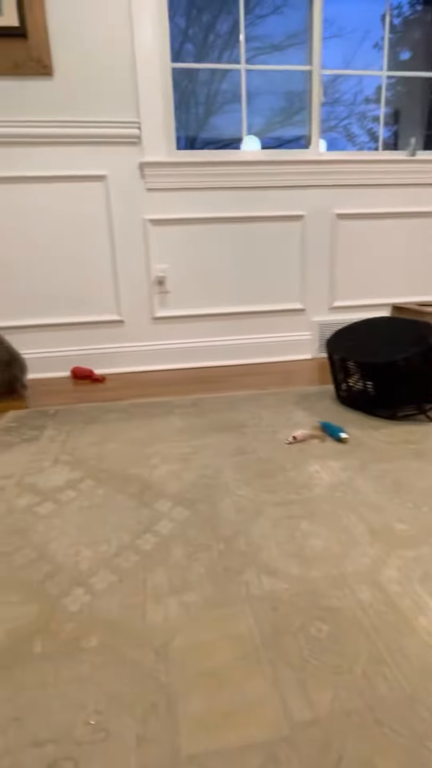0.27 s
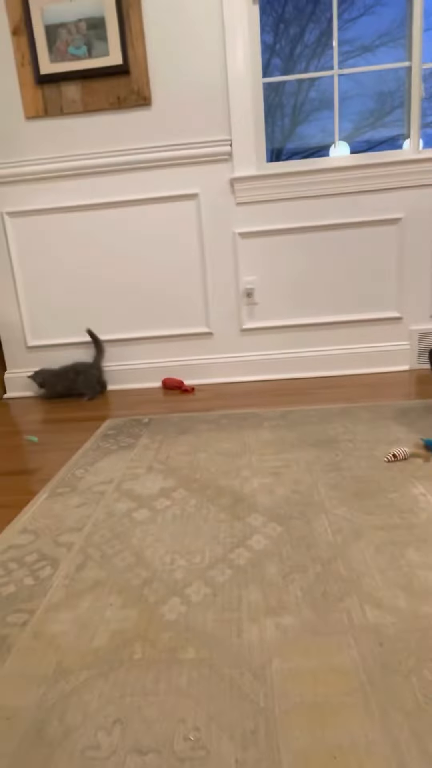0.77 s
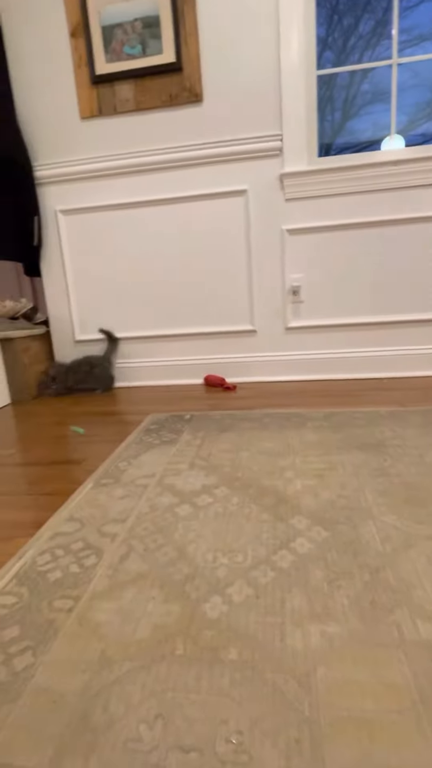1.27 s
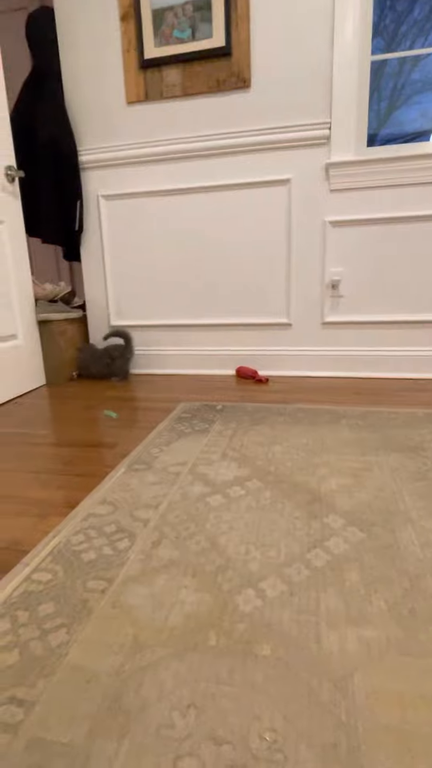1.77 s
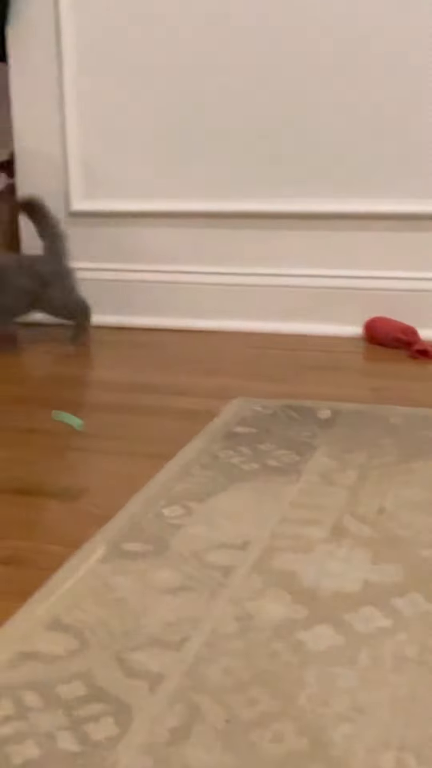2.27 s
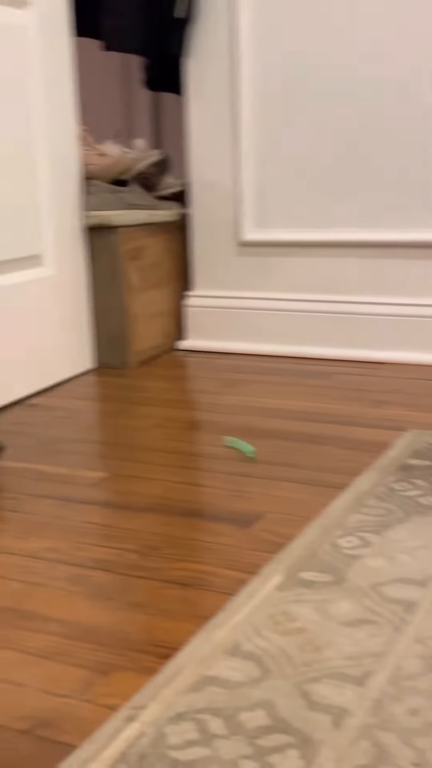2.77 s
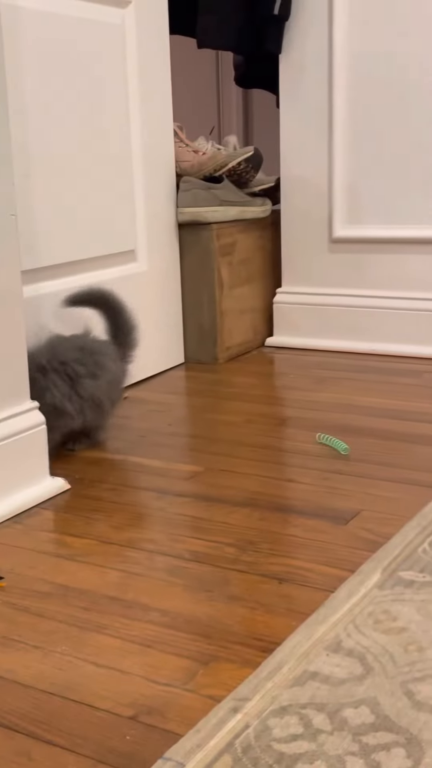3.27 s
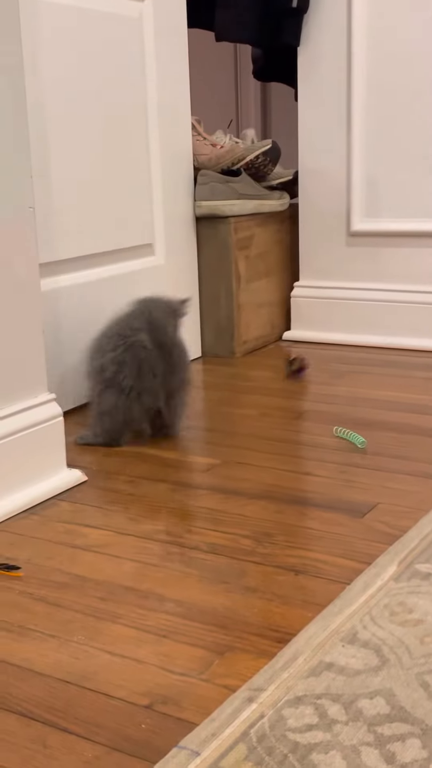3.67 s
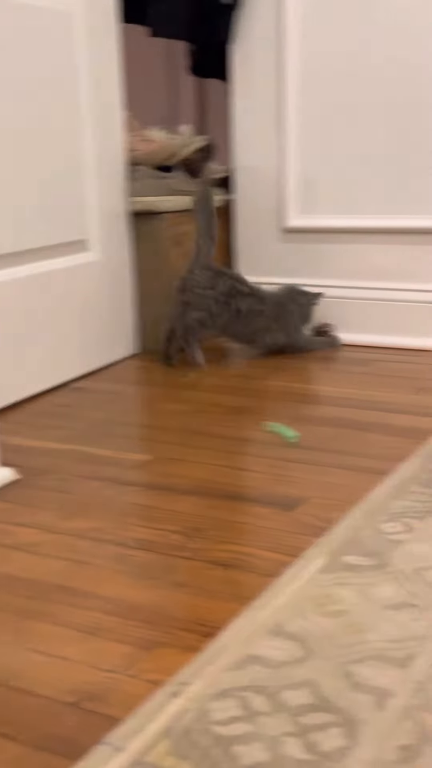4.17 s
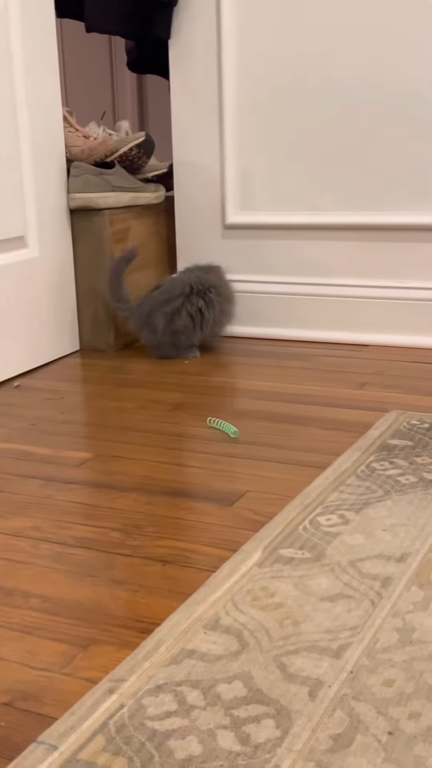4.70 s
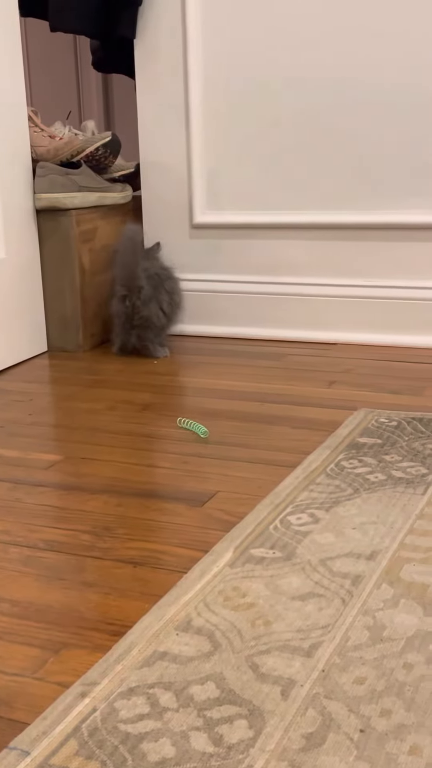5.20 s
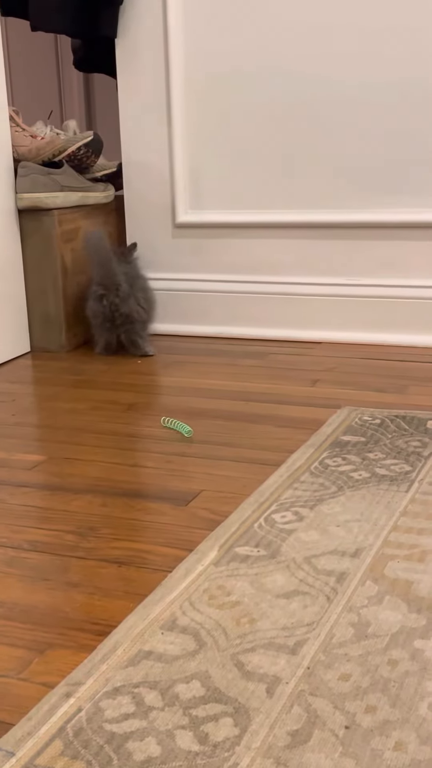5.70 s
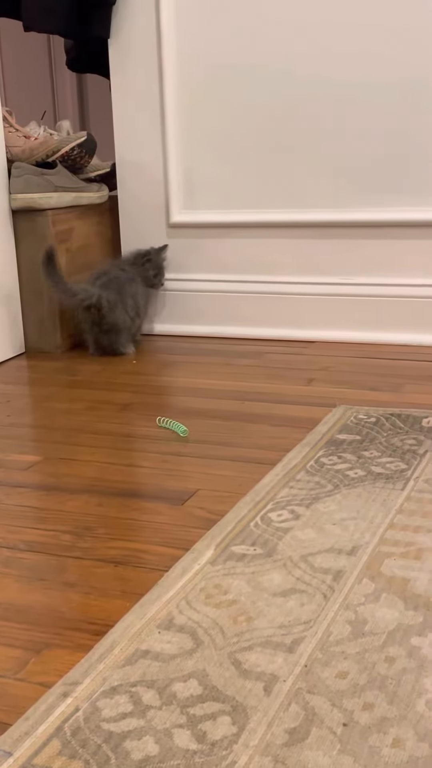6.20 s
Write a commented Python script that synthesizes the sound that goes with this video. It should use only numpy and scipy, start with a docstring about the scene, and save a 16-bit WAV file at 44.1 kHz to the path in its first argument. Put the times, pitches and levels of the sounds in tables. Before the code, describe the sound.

A kitten scampers indoors, paws thudding softly and claws ticking on wood while a crinkly foil ball rustles and rattles in irregular bursts.

```python
"""In a quiet hall, a kitten scampers over a rug and a wooden floor, chasing a crinkly foil ball.
Paws thud as dying low tones, knocks wake the wood, claws and ball tick, and random clicks make the foil rustle.
A faint squeak sounds once; fingers creak on the phone casing: short dying tones, each slightly off in pitch.
Filtered noise gives the low hum of the house. Two microphone ports a few centimetres apart hear it all."""
import sys
import numpy as np
from scipy import signal
from scipy.fft import rfft, irfft
from scipy.io import wavfile
from scipy.ndimage import uniform_filter1d

SR = 44100
rng = np.random.default_rng(int(sys.argv[2]) if len(sys.argv) > 2 else 0)


def int16_out(signal):
    """Quantize to a 16-bit WAV file."""
    q = np.round(np.clip(np.atleast_2d(signal).T, -1, 1) * 32767)
    wavfile.write(sys.argv[1], SR, q.astype(np.int16))


N = 284445

# Levels set the balance at each source; the hall and the ports change them later.
# paws and body landing on boards: t/s, level/dB, f/Hz, joists relative to the board/dB
THUDS = [(0.009, -52, 101, -8), (0.106, -43.5, 159, -30), (0.145, -37, 172, -13), (0.19, -42.5, 176, -17),
         (0.235, -26.5, 179, -35), (0.25, -37, 226, -20), (0.284, -38.5, 225, -16),
         (0.301, -38.5, 214, -23), (0.33, -27.5, 164, -12), (0.375, -36.5, 177, -21),
         (0.487, -39.5, 251, -14), (0.597, -36.5, 203, -14), (0.612, -45.5, 225, -22),
         (0.702, -42, 268, -8), (0.709, -44, 131, -22), (0.744, -45.5, 320, -27), (0.775, -49.5, 322, -19),
         (0.801, -50, 333, -24), (0.897, -50, 220, -24), (0.933, -50, 244, -21), (0.986, -48.5, 217, -24),
         (0.989, -48, 92, -8), (1.035, -54, 100, 7), (1.168, -45, 257, -19), (1.199, -44.5, 278, -22),
         (1.214, -48.5, 245, -27), (1.243, -52, 157, -17), (1.412, -46, 265, -23), (1.47, -45.5, 241, -10),
         (1.508, -55, 104, -5), (1.605, -50, 235, -57), (1.917, -51, 101, -8), (2.228, -41.5, 164, -17),
         (2.247, -45, 184, -27), (2.371, -43, 118, -2), (2.461, -45.5, 131, -5), (2.572, -61, 112, 10),
         (2.641, -43, 279, -8), (2.684, -39.5, 325, -21), (2.699, -47, 284, -17), (2.728, -42.5, 397, -14),
         (2.736, -50, 357, -18), (2.747, -49.5, 198, -20), (3.647, -67, 111, 17), (3.764, -45, 104, -16),
         (4.089, -27, 257.8, -24), (4.499, -52.5, 209, -19), (4.527, -52.5, 297, -4),
         (4.791, -55, 172, -27), (5.637, -33, 178, -7.5), (5.663, -73, 141, -8), (5.685, -45, 102.7, 2),
         (5.719, -58, 130, -7), (5.799, -46.5, 163, 2), (5.814, -54, 94.7, -5), (5.86, -53.5, 182, 1)]
BOARD_T60_S, BOARD_RISE_S = 0.037, 0.013
PITCH_SAG = .1  # share by which a board's pitch starts high
# hollow knocks on wood: t/s, level/dB, f/Hz, change one octave away/dB
KNOCKS = [(0.013, -44, 850, -3), (0.142, -42, 596, -50), (0.486, -30.5, 890, -39), (1.047, -38.5, 920, -22),
          (1.058, -42, 840, -43), (2.557, -42.5, 1360, -28), (2.61, -60, 402, -6), (2.6307, -36, 900, -9),
          (2.6359, -35, 1245, -68), (2.6418, -29, 1340, -50), (2.646, -38, 2300, -20),
          (2.65, -35.5, 550, -31), (2.699, -54, 590, -1), (2.732, -53, 517, -23), (2.754, -49, 1260, -17),
          (3.148, -46.5, 730, -12), (3.366, -43, 990, -21), (4.09, -47, 404, -30), (4.26, -45.5, 930, -31),
          (4.305, -51.5, 970, -30), (4.5, -44.5, 564, -24), (4.566, -40.5, 640, -17), (4.58, -44, 563, -11),
          (4.981, -47, 620, -34), (5.003, -39, 645, -49), (5.143, -41.5, 670, -34), (5.287, -44, 570, -9.5),
          (5.343, -41, 670, -29), (5.436, -49.5, 650, -26), (5.47, -47, 605, -34), (5.63, -51.5, 1200, -33),
          (5.793, -47, 655, -32), (5.815, -49.5, 740, -20), (5.941, -61, 706, 11),
          (6.0775, -36.5, 790, -24), (6.083, -36.5, 624, -18), (6.391, -41.5, 690, -20)]
# ringing modes of floor and skirting: f/Hz
WOOD_MODES_HZ = [300, 390, 490, 560, 640, 730, 810, 910, 1010, 1110, 1220, 1330, 1460, 1620, 1800, 2050,
                 2350, 2700, 3100]
RATTLE_T60_S = 0.052
# the foil ball rolls and crumples: t/s, length/s, level/dB, brightness/dB per octave
FOIL_ROLLS = [(0, 0.051, -53, -10), (0.101, 0.068, -47, 0.5), (0.236, 0.42, -53.5, -2),
              (0.466, 0.077, -43, 0), (0.554, 0.061, -64, 3), (0.688, 0.2, -56.5, -0.8),
              (0.879, 0.094, -52.5, -3.5), (0.95, 0.18, -53, -1.3), (1.144, 0.4, -53.5, 1.8),
              (1.412, 0.26, -53.5, -1.5), (1.664, 0.11, -62, 2), (1.808, 0.22, -65, -2),
              (2.008, 0.048, -56.5, 2.5), (2.125, 0.071, -58, 1), (2.195, 0.039, -56, 3.5),
              (2.335, 0.06, -58, -0.3), (2.463, 0.14, -70, 7.5), (2.551, 0.16, -44.5, -1.5),
              (2.67, 0.3, -57.5, -4), (2.842, 0.47, -76, 0.5), (3.104, 0.18, -58.5, 0.5),
              (3.343, 0.087, -56, 4), (3.389, 0.24, -57.5, 1), (3.623, 0.033, -71, 14.5),
              (3.679, 0.03, -50.5, 0.5), (3.758, 0.12, -63, 1), (3.836, 0.77, -66.5, 0),
              (4.074, 0.056, -43, -2), (4.118, 0.091, -47, -2), (4.26, 0.66, -64, -0.9),
              (4.626, 0.21, -54, 0.5), (4.68, 0.16, -63, -3), (4.785, 0.21, -55.5, 0.5),
              (5.004, 0.14, -61.5, 1.5), (5.194, 0.064, -91, -9), (5.353, 0.15, -70.5, -3),
              (5.59, 0.059, -77.5, 8.5), (5.769, 0.19, -93, -22), (5.884, 0.41, -67, -1),
              (6.07, 0.076, -68.5, 5.5), (6.386, 0.15, -69.5, 2.5)]
ROLL_RISE, ROLL_FALL = 0.14, 1  # shares of a roll; the lower of the two ramps sets the level
# claws and foil, struck: t/s, crackle level/dB, tick f/Hz, tick relative to the crackle/dB
STRIKES = [(0.014, -76, 2500, 3), (0.0964, -50, 1900, -20), (0.2184, -34, 3200, -8),
           (0.457, -39.5, 6000, 1), (0.471, -32, 3730, -3), (0.617, -37.5, 5560, -13),
           (0.724, -48, 5300, -14), (0.7905, -45.5, 5000, -8), (0.88, -38, 4950, -2),
           (0.899, -43.5, 4920, 1), (0.98, -48.5, 4410, 6), (0.993, -54, 3500, 13), (1.135, -47, 4080, -21),
           (1.2043, -42, 5170, 2.5), (1.239, -32, 3830, -8), (1.389, -41, 4880, -16), (1.452, -39, 3460, 1),
           (1.478, -48.5, 4540, -6), (1.687, -47.5, 3300, 1.5), (1.721, -46, 4070, -15),
           (1.8, -48, 5270, -9), (1.867, -52, 4430, -10), (1.878, -54.5, 4340, 2), (1.935, -48, 5260, -8),
           (2.0173, -47.5, 3950, -8), (2.107, -44.5, 3220, -10), (2.201, -47.5, 5600, -7),
           (2.295, -45.5, 5180, -6), (2.357, -48.5, 2920, -1), (2.41, -39.5, 2830, -9),
           (2.417, -50.5, 3620, 11.5), (2.461, -36.5, 3580, -17), (2.5582, -35.5, 4930, -2),
           (2.6375, -40.5, 2060, 7.5), (3.1214, -47, 5500, -6), (3.358, -45.5, 2500, -10),
           (3.368, -41, 1840, -1), (3.37, -58, 3010, 11.5), (3.41, -56, 4130, 0), (3.433, -53, 3020, 8),
           (3.437, -54.5, 3600, 12.5), (3.5572, -46, 2760, -7), (3.561, -67.5, 1590, 13),
           (3.623, -45, 4930, -9), (3.627, -67, 1320, 1), (3.687, -55, 2640, -4), (3.739, -40.5, 3020, -22),
           (3.899, -56.5, 3040, -6), (4.009, -47, 3700, 15.5), (4.01, -54, 2040, 12),
           (4.008, -63, 5520, 18), (4.08, -59, 5100, -12), (4.087, -54, 2940, -5), (4.292, -62, 4620, 2),
           (4.356, -46.5, 1880, -8), (4.631, -49, 4700, -13), (4.67, -40.5, 2170, -14),
           (4.7, -45, 3000, -8), (4.7835, -86.5, 4520, -3), (4.831, -58, 2580, 5), (4.876, -48, 4170, -8),
           (4.892, -68, 3050, 17.5), (4.913, -73, 4760, -3), (4.985, -54, 4300, -22),
           (5.084, -61, 2140, 8.5), (5.215, -70, 2460, 4), (5.254, -76, 3430, 11.5), (5.2887, -80, 1910, 8),
           (5.343, -73, 2160, 14), (5.594, -67.5, 4930, -3), (5.629, -67, 2100, 3), (5.899, -61, 2700, 2),
           (5.92, -60.5, 2500, 4.5), (5.9855, -57, 2000, 2), (6.029, -61, 5230, 0), (6.043, -80, 4470, 0)]
CRACKLE_T60_S = 0.061
STRIKE_FALL_DB = -3  # change of a blow's crackle, per octave away from its tick pitch
TICK_T60_S, TICK_RISE_S = 0.012, 0.00074
# spectrum of the foil before rolls and blows shape it: f/Hz, level/dB per Hz
FOIL_COLOUR = [(300, -42), (600, -0.5), (1300, -7.5), (2000, 2), (3000, 0.5), (5000, 2.5), (7500, -2),
               (10000, -2.5), (13000, -8.5), (16000, -4)]
# centres of the bands in which creases sound: f/Hz
CREASE_BANDS_HZ = [900, 1500, 2300, 3300, 4600, 6500, 10000, 14500]
FOIL_MID_HZ = 4000  # where a roll's brightness changes nothing
# thin dry snaps of single creases: t/s, level/dB
SNAP_TIMES = [(.2982, -41), (1.2426, -31), (3.1203, -41), (3.3653, -43), (3.6798, -46), (3.7387, -36.5),
              (4.0801, -37), (4.292, -46), (4.4952, -53), (4.7845, -45), (4.88, -41), (4.985, -54),
              (5.376, -62), (6.0425, -46.5)]
# tones mixed into each snap: f/Hz, level/dB
SNAP_TONES = [(4800, -8), (7200, -14), (9400, 10.5), (11500, 4), (14000, 4)]
SNAP_T60_S = .0018
# light steps too dense to tell apart: t/s, soft pads level/dB, harder steps level/dB
PATTER_LEVELS = [(0.0, -57.5, -60.5), (0.15, -70, -68), (0.3, -50, -54), (0.43, -57, -67),
                 (0.6, -62.5, -62.5), (0.75, -56, -64.5), (1.02, -60.5, -61), (1.3, -63.5, -69.5),
                 (1.95, -68, -72), (2.15, -76, -95), (2.45, -79, -56), (2.65, -49.5, -96),
                 (2.91, -65.5, -71.5), (3.9, -63, -77.5), (4.2, -62.5, -63), (4.56, -62, -83),
                 (4.9, -66.5, -78), (5.21, -64.5, -79), (5.6, -67.5, -86), (6.15, -63.5, -72),
                 (6.45, -67, -86)]
# spectrum of the soft pads: f/Hz, level/dB per Hz
SOFT_COLOUR = [(130, 0), (200, 2.5), (320, 4.5), (600, -5.5), (1500, -56.5)]
# spectrum of the harder steps: f/Hz, level/dB per Hz
HARD_COLOUR = [(300, -19), (500, 2), (800, 8), (1300, -6), (2500, -21.5)]
# one faint thin squeak: length/s, f/Hz
SQUEAK_TONE = (0.075, 2250)
SQUEAK_S, SQUEAK_DB = .325, -57  # start, level
# finger creaks on the casing: t/s, level/dB, reach to the right port 0-1, click level/dB
CREAKS = [(1.7995, -38, 1, -56), (1.8118, -37.5, 0.87, -54), (1.824, -34, 1, -47), (1.837, -34, 0.84, -49),
          (1.859, -31.5, 0.96, -45), (1.907, -32.5, 1, -39.5), (1.9137, -42, .9, -70), (1.921, -35, 1, -70),
          (1.925, -38, 0.45, -64), (2.105, -34, 0.26, -62)]
# flexing modes of the casing: f/Hz, level/dB, share in the right port (minus = opposed), ring/s
CASING_MODES = [(460, 4, -1.1, 0.0034), (1005, 0.5, -0.97, 0.0038), (1830, -7, -1.3, .002),
                (2350, -18, -1.7, 0.0017)]
SLIP_GRIP_S = .0009  # a slip builds fast
SLIP_PITCH_SPREAD = .02  # typical share by which a slip's steady pitch is off
# spectrum of the air in the house: f/Hz, level/dB per Hz
AIR_COLOUR = [(20, -56), (40, -30.5), (70, -5.5), (150, -8), (320, -14), (600, -17), (1000, -22),
              (1650, -34.5), (3500, -43.5), (7000, -50), (16000, -50)]
# spectrum of the low hum: f/Hz, level/dB per Hz
HUM_COLOUR = [(35, -58), (52, -11), (62, -3), (70, 8.5), (80, -6), (95, -19), (130, -58)]
AIR_DB, HUM_DB = -60.5, -58.5
# how fast the hall's reflections die: f/Hz, time to fall 60 dB/s
HALL_T60 = [(100, 0.39), (400, 0.27), (1000, 0.52), (3000, 0.55), (8000, 0.36), (16000, 0.015)]
HALL_DB, NEAR_HALL_DB = -3, -8  # each set of reflections before blending: most sounds, sharp ticks
# how alike the two ports hear: f/Hz, likeness 0-1
PORT_LIKENESS = [(60, .94), (250, .96), (600, .6), (1200, .35), (3500, .55), (5000, .75), (7000, .75),
                 (16000, .75)]
# how far the left port leads: f/Hz, lead/radians
PORT_LEAD = [(100, 0), (2000, .2), (2600, 1.1), (4200, .7), (5100, .1), (6200, 1.7), (7100, 2.9),
             (8400, 3.4), (10300, 6), (12000, 6.5), (13200, 9.1), (14900, 9.7), (16000, 10.9)]
# balance of the ports: f/Hz, left minus right/dB
PORT_TILT = [(60, 1), (180, 2), (550, 1.5), (1650, 4.5), (4970, 2), (15000, -1)]
EDGE_HZ = 16000  # upper band limit


def thuds():
    """Each landing rings a board and, lower and longer, the joists below."""
    out = np.zeros(N)
    for s, db, hz, joist_db in THUDS:
        board = ring(hz, BOARD_T60_S, BOARD_RISE_S, PITCH_SAG)
        overtone = 0.31 * ring(1.331 * hz, 0.87 * BOARD_T60_S, BOARD_RISE_S)
        joists = gain_of(joist_db) * ring(89.3, 0.096, 0.02)
        add(out, s, gain_of(db) * (board + overtone + joists))
    return out


def knocks():
    """Each knock is a blow and a dying rattle; it wakes the wood modes near its pitch."""
    out = np.zeros(N)
    t = np.arange(SR // 4) / SR
    modes = np.array([ring(hz, 0.013 + 6.6 / hz, 0.002)[:2000] for hz in WOOD_MODES_HZ])
    grains = rng.standard_normal((len(KNOCKS), len(t)))
    for (s, db, hz, slope_db), grain in zip(KNOCKS, grains):
        blows = 1.25 * grain * abs(grain) * gain_of(-60 * t / RATTLE_T60_S)
        blows[0] += 19.  # the first hit
        octaves = np.log2(np.divide(WOOD_MODES_HZ, hz))
        # every mode answers a little differently each time
        shares = gain_of(2.86 * grain[-len(modes):]) * gain_of(slope_db * octaves ** 2)
        sound = signal.fftconvolve(blows, shares @ modes)
        add(out, s, gain_of(db) * sound / abs(sound).max())
    return out


def foil():
    """Creases give random clicks: they swell and fade with each roll, and burst and die at each blow."""
    level = np.zeros((len(CREASE_BANDS_HZ), N))
    for s, length, db, tilt_db in FOIL_ROLLS:
        u = np.linspace(0, 1, round(length * SR))
        shape = np.clip(np.minimum(u / ROLL_RISE, (1 - u) / ROLL_FALL), 0, 1)
        for row, band in zip(level, CREASE_BANDS_HZ):
            add(row, s, gain_of(db + tilt_db * np.log2(band / FOIL_MID_HZ)) * shape)

    t = np.arange(SR // 3) / SR
    for s, db, hz, _ in STRIKES:
        burst = gain_of(db - 60 * t / CRACKLE_T60_S) * (1 - np.exp(-t / 0.0027))
        for row, band in zip(level, CREASE_BANDS_HZ):
            add(row, s, gain_of(STRIKE_FALL_DB * abs(np.log2(band / hz))) * burst)

    out = np.zeros(N)
    shared = crackle(2500, 2.33)  # clicks heard in every band
    octave = np.log2(np.fft.rfftfreq(N, 1 / SR) + 1)
    for row, share in zip(level, np.eye(len(level))):
        own = 2.0 * crackle(500, 3.05)  # clicks of this band alone
        spectrum = rfft(coloured(shared + own, FOIL_COLOUR))
        band_gain = np.interp(octave, np.log2(CREASE_BANDS_HZ), share)
        out = out + row * irfft(spectrum * band_gain, N)
    return out


def ticks():
    """Each blow of claw or foil rings a short high tone; the single snaps join in."""
    out = snaps()
    for s, db, hz, tick_db in STRIKES:
        add(out, s, gain_of(db + tick_db) * ring(hz, TICK_T60_S, TICK_RISE_S))
    return out


def snaps():
    """Single creases of the foil give way, each with one click."""
    out = np.zeros(N)
    for s, db in SNAP_TIMES:
        add(out, s, gain_of(db) * snap())
    return out


def snap():
    """A very short bright click, peak 1, made of tones that die at once."""
    x = sum(gain_of(db) * ring(hz, SNAP_T60_S, 0.00018)[:450] for hz, db in SNAP_TONES)
    return x / abs(x).max()


def patter():
    """Many small steps are random clicks, coloured soft or hard."""
    soft = coloured(crackle(500, 2.7), SOFT_COLOUR)
    hard = coloured(crackle(500, 5.7), HARD_COLOUR)
    return gain_of(curve(PATTER_LEVELS, 1)) * soft + gain_of(curve(PATTER_LEVELS, 2)) * hard


def squeak():
    """One short tone whose pitch wavers at random."""
    length, hz = SQUEAK_TONE
    out = np.zeros(N)
    t = np.arange(round(length * SR)) / SR
    waver = evened(uniform_filter1d(rng.standard_normal(len(t)), 200))
    turns = np.cumsum(hz * (1 + .025 * waver)) / SR
    add(out, SQUEAK_S, gain_of(SQUEAK_DB) * np.hanning(len(t)) ** .5 * np.sin(2 * np.pi * turns))
    return out


def creaks():
    """Dry slips click and flex the casing, pushing one port in as the other goes out; low modes speak last."""
    out = np.zeros((2, N))
    t = np.arange(-450, 900) / SR
    chances = rng.standard_normal((len(CREAKS), len(CASING_MODES), 2))
    for (s, db, reach, click_db), chance in zip(CREAKS, chances):
        for (hz, mode_db, share, ring_s), (stray, push) in zip(CASING_MODES, chance):
            late = t - 0.77 / hz
            span = np.where(late < 0, SLIP_GRIP_S + 0.23 / hz, ring_s)
            # each slip grips a little differently
            strength = gain_of(db + mode_db + 1.1 * push)
            wave = np.sin(2 * np.pi * hz * (1 + SLIP_PITCH_SPREAD * stray) * late)
            slip = strength * np.exp(-abs(late / span) ** 1.2) * wave
            add(out[0], s + t[0], slip)
            add(out[1], s + t[0], slip * share * reach)
        for port in out:
            add(port, s, gain_of(click_db) * snap())
    return out


def house():
    """Faint air is noise that swells unevenly; a narrow band of low noise makes a lumpy hum."""
    smooth = uniform_filter1d(uniform_filter1d(rng.standard_normal(N), 4000), 4000)
    swell = evened(smooth)
    sides = []
    for _ in range(2):
        air = coloured(rng.standard_normal(N), AIR_COLOUR) * gain_of(AIR_DB + 0.5 * swell)
        hum = coloured(rng.standard_normal(N), HUM_COLOUR) * gain_of(HUM_DB)
        sides.append(air + hum)
    return ports(*sides)


def hall(x, wet_db, count=3):
    """A few patterns of reflections take turns in a steady cycle, so no single one colours the sound."""
    turn = 2 * np.pi * 2.3 * np.arange(N) / SR
    shares = [np.sqrt(2 / count) * abs(np.cos(turn / 2 + np.pi * k / count)) for k in range(count)]
    # keeps the direct sound steady while the shares change
    loss = np.sqrt(sum(shares) ** 2 + 1e-9) / np.sqrt(2)
    out = 0
    for share in shares:
        part = (x * share / loss)[None]
        out = out + signal.fftconvolve(part, reflections(wet_db), axes=1)[:, :N]
    return out


def reflections(wet_db):
    """Direct sound, then sparse reflections, each band dying at its own speed."""
    taps = np.zeros((2, SR))
    at = np.arange(200, SR - 20, 20) + rng.integers(0, 20, (2, (SR - 201) // 20))
    np.put_along_axis(taps, at, rng.choice([-1., 1.], at.shape), 1)
    hz, t, z = signal.stft(taps, SR, nperseg=256)
    fade = gain_of(-60 * t / read(HALL_T60, hz)[:, None])
    tail = signal.istft(z * fade, SR, nperseg=256)[1][:, :SR]
    tail = gain_of(wet_db) * tail / np.linalg.norm(tail[0])
    tail[0, 0], tail[1, 30] = 1, 1  # direct sound; 30 samples later in the unrelated part
    return ports(*tail)


def ports(a, b):
    """Left hears a; right hears a blend of a and the unrelated b, by frequency."""
    same = np.clip(read(PORT_LIKENESS, np.fft.rfftfreq(len(a), 1 / SR)), 0, 1)
    right = irfft(same * rfft(a) + np.sqrt(1 - same ** 2) * rfft(b), len(a))
    return np.array([a, right])


def ring(hz, t60, rise_s, sag=0):
    """A dying mode with a soft start, peak 1; its pitch may start high and settle."""
    t = np.arange(SR // 3) / SR
    turns = hz * (t + sag * t60 / 4 * (1 - np.exp(-4 * t / t60)))
    x = (1 - np.exp(-t / rise_s)) * gain_of(-60 * t / t60) * np.sin(2 * np.pi * turns)
    return x / abs(x).max()


def crackle(per_s, spread_db):
    """Random clicks, a few of them large."""
    size = gain_of(spread_db * np.minimum(rng.exponential(1, N), 5))
    return size * (rng.random(N) < per_s / SR) * rng.choice([-1., 1.], N)


def coloured(x, points):
    """Gives x a spectrum through a filter that never sounds early (minimum-phase), rms 1."""
    hz = abs(np.fft.fftfreq(8192, 1 / SR))
    log_gain = np.log(gain_of(np.maximum(read(points, hz), -100)))
    taps = np.fft.ifft(np.exp(log_gain - 1j * signal.hilbert(log_gain).imag)).real[:4096]
    return evened(signal.oaconvolve(x, taps)[..., :N])


def add(mix, s, sound):
    """Adds a sound at time s."""
    part = mix[max(round(s * SR), 0):][:len(sound)]
    part += sound[:len(part)]


def curve(rows, column):
    """One column of a time table, at every sample."""
    rows = np.array(rows)
    return np.interp(np.arange(N) / SR, rows[:, 0], rows[:, column])


def read(points, hz):
    """Reads a spectrum table on a log-frequency axis."""
    f, value = np.transpose(points)
    return np.interp(np.log(hz + 1), np.log(f + 1), value)


def evened(x):
    """Scales to rms 1."""
    return x / np.sqrt(np.mean(x ** 2) + 1e-20)


def gain_of(db):
    """Decibels to a factor."""
    return 10 ** (np.asarray(db) / 20)


def scene():
    """Kitten and foil in the hall, over the house; the creaks reach the ports directly."""
    full = hall(thuds() + knocks() + foil() + patter() + squeak(), HALL_DB)
    sharp = hall(ticks(), NEAR_HALL_DB)
    return full + sharp + house() + creaks()


def record(dry):
    """Port spacing shifts phase and balance; the capsules lose deep bass and a little level; highs are cut."""
    hz = np.fft.rfftfreq(N, 1 / SR)
    # half of the difference goes to each port
    half = gain_of(read(PORT_TILT, hz) / 2) * np.exp(.5j * read(PORT_LEAD, hz))
    bass = (hz / 48.1) ** 3 / np.sqrt(1 + (hz / 41.86) ** 6)
    heard = irfft(rfft(dry) * [half, 1 / half] * bass, N)
    band_limit = signal.firwin(511, EDGE_HZ, window=("kaiser", 9), fs=SR)
    return signal.oaconvolve(heard, band_limit[None], "same")


dry = scene()
out = record(dry)
int16_out(out)
```